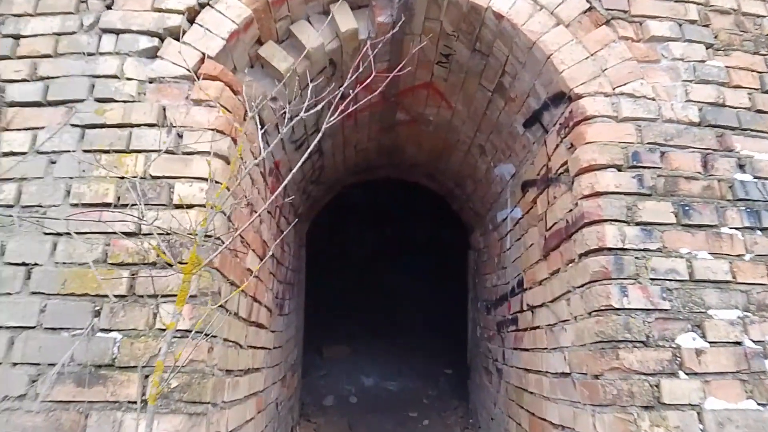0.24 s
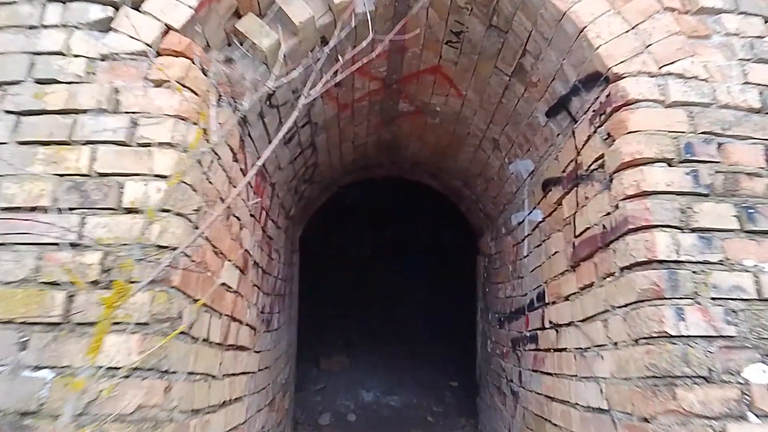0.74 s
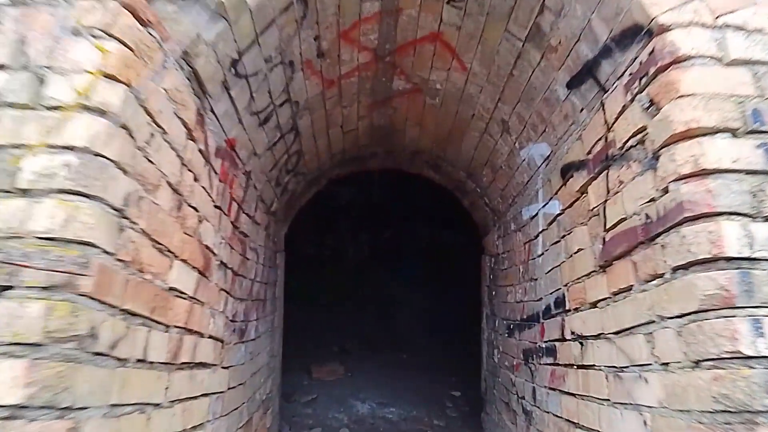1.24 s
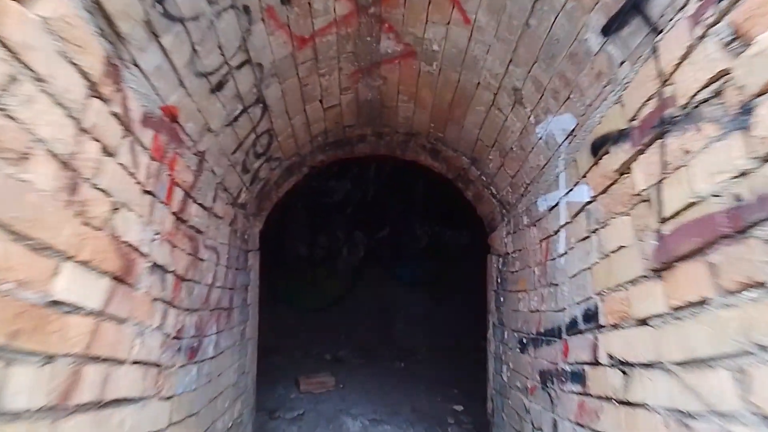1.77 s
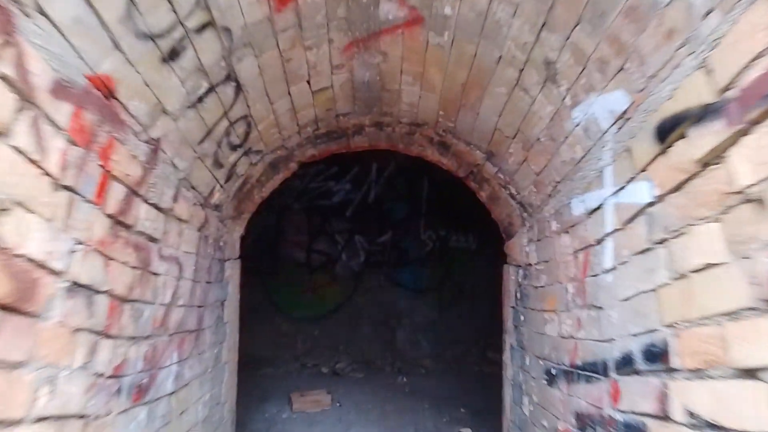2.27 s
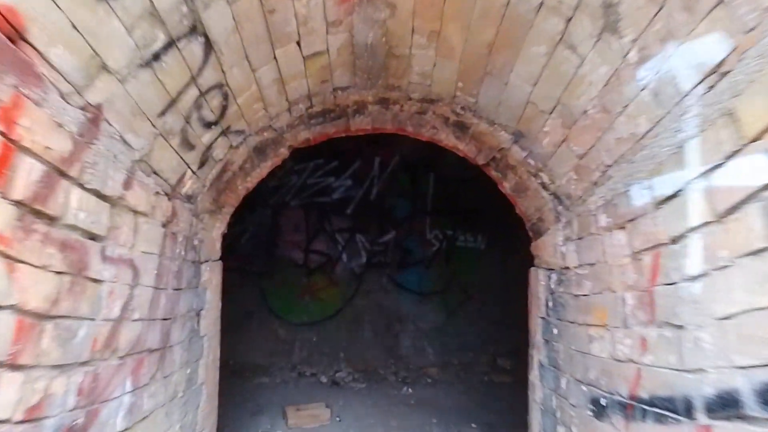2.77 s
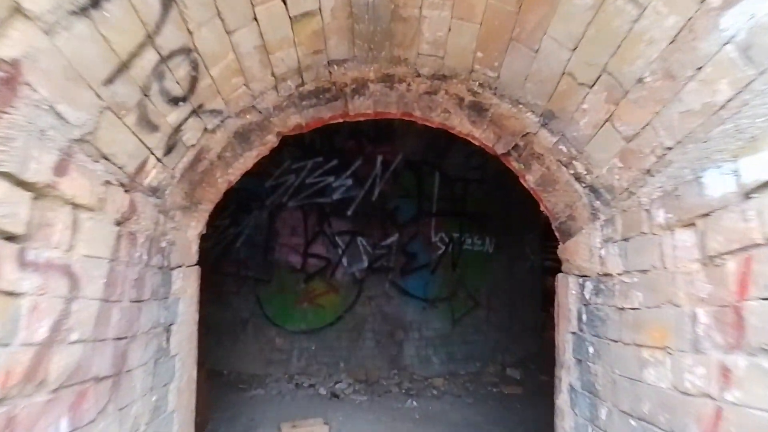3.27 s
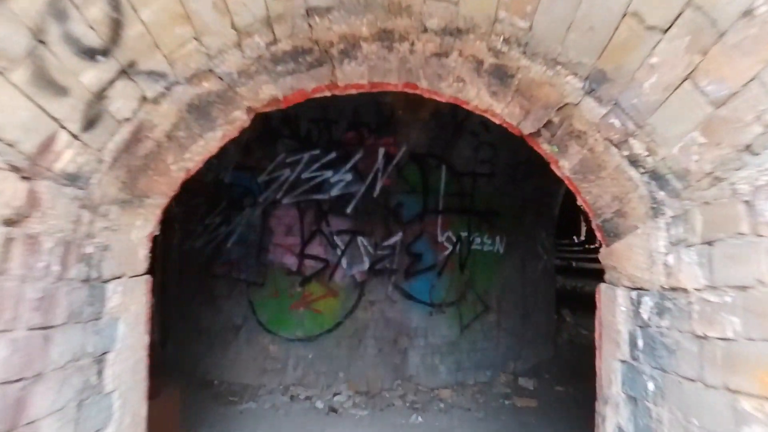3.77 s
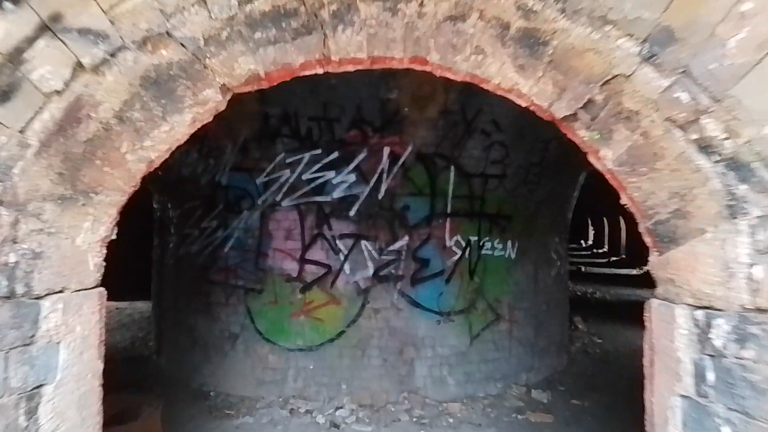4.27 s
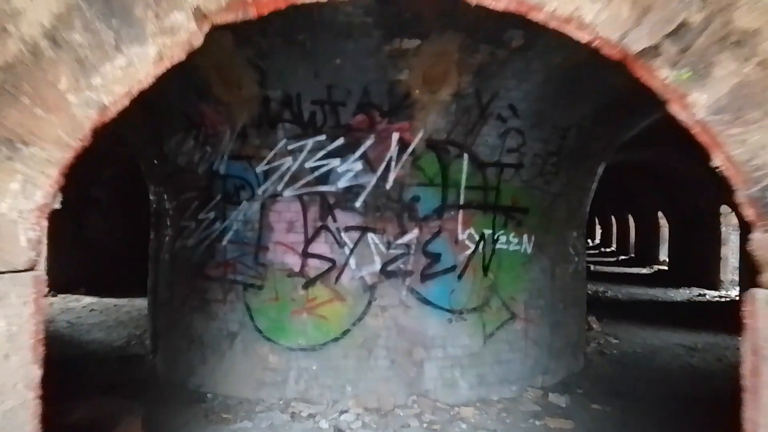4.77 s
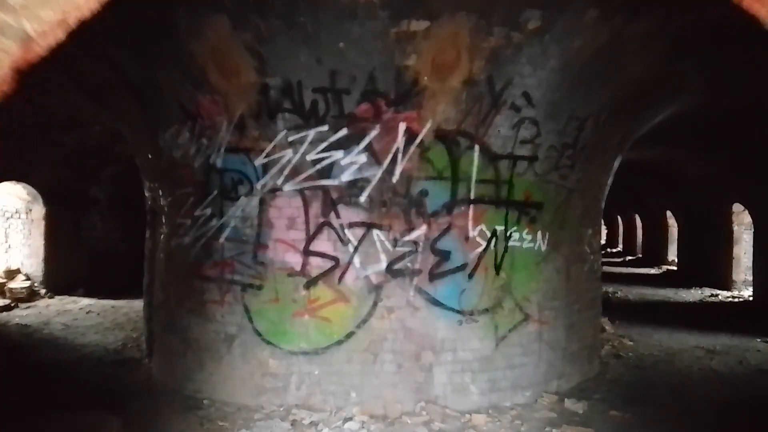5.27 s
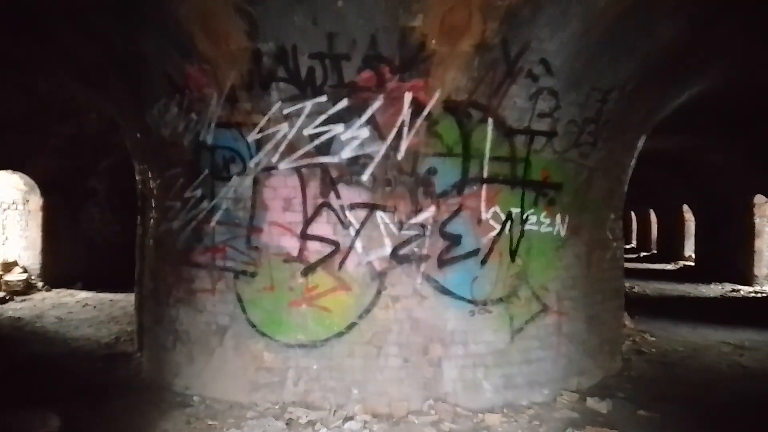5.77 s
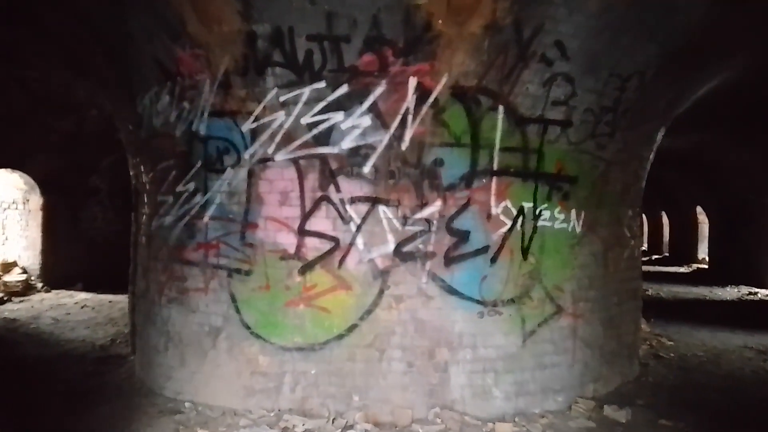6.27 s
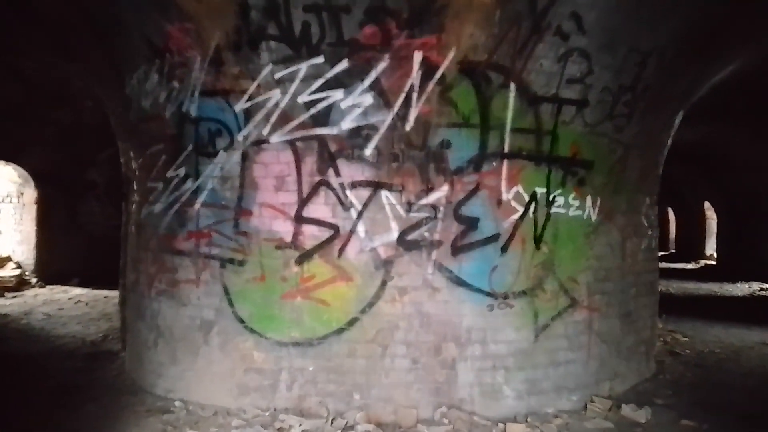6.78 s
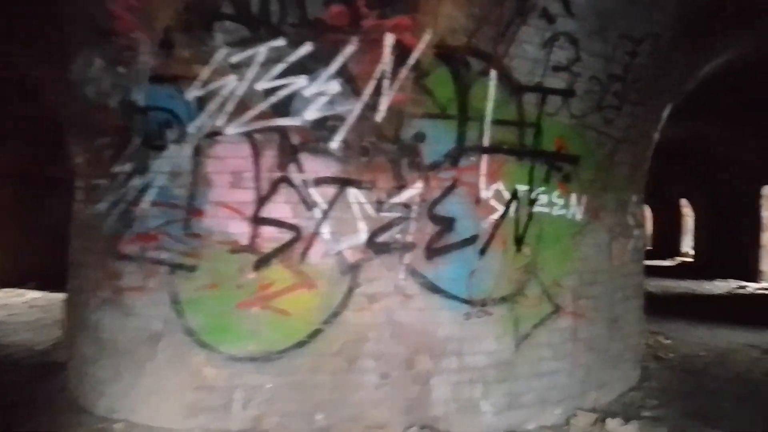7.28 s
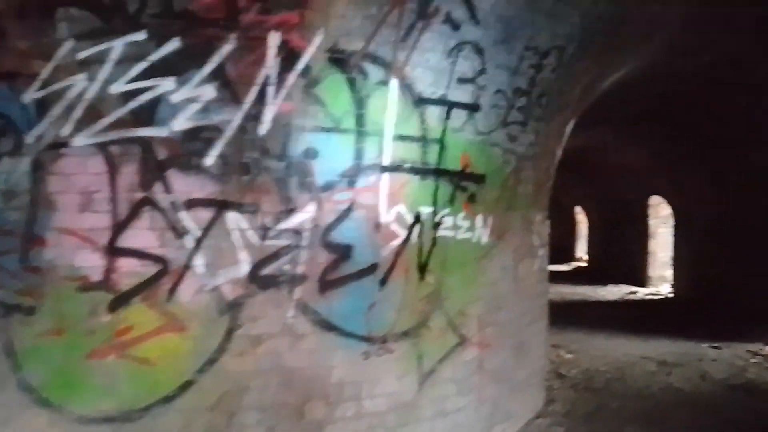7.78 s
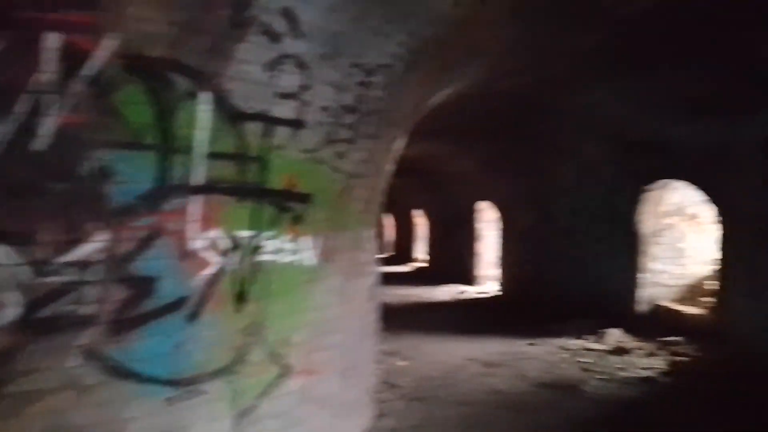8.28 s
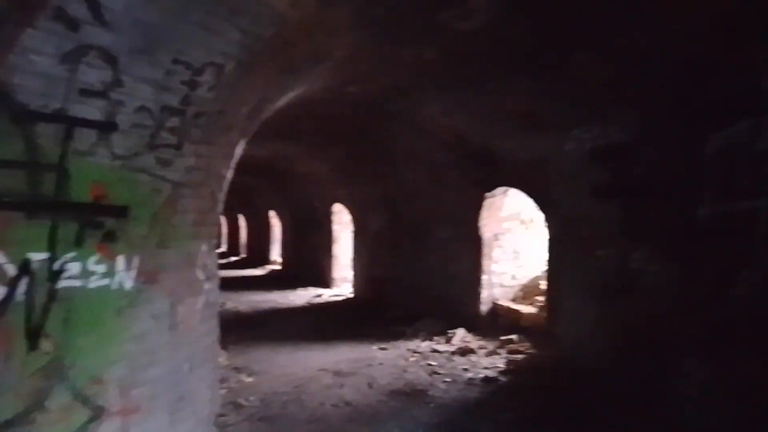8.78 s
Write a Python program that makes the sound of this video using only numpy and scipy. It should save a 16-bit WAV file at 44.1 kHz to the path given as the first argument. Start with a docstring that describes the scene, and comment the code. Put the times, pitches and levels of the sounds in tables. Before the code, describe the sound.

Slow footsteps crunch over loose broken brick and grit, pieces knocking underfoot, moving from open air through a brick passage into a quiet vault.

```python
"""Slow footsteps crunch over loose broken brick and grit, from open air through a brick passage to a vault.
A step is a damped thud plus a crunch of filtered grain impulses; scuffs, sand slides and chip ticks fill in.
Rocking brick pieces knock: a damped swing with a burst of noise through brick resonances.
Decaying noise gives the near walls' prompt echo and the vault's long, faint one; two resonances ring.
Beneath lie shaped-noise air, a low rumble, a thin drifting hiss and a low hum that swells at the end."""
import sys
import numpy as np
from scipy import signal
from scipy.fft import rfft, irfft
from scipy.io import wavfile
from scipy.ndimage import uniform_filter1d

SR = 44100
rng = np.random.default_rng(int(sys.argv[2]) if len(sys.argv) > 2 else 0)


def wav_record(signal):
    """Record a signal, one row per channel, as 16-bit PCM in the file named by sys.argv[1]."""
    frames = np.transpose(np.atleast_2d(signal))
    bounded = np.clip(frames, -1, 1)
    # unit amplitude maps onto the largest positive 16-bit level
    quanta = np.round(bounded * 32767).astype(np.int16)
    wavfile.write(sys.argv[1], SR, quanta)


N = 397782
TIME = np.arange(N) / SR
# likeness of left and right: f/Hz, coherence/1
LIKENESS = [(60, 1), (250, 1), (600, 0.68), (1500, 0.47), (3500, 0.2), (8000, 0.045)]
CRUMB_SPAN = 2.9  # ratio of crumb band edge to crunch pitch


def undb(db):
    """Decibels to gain."""
    return 10 ** (np.asarray(db) / 20)


def unit(x):
    """Scale to rms 1."""
    return x / np.sqrt(np.mean(x ** 2) + 1e-20)


def add(out, start_s, x):
    """Mix x into out at start_s, trimmed to fit."""
    i = int(round(start_s * SR))
    a, b = max(i, 0), min(i + x.shape[-1], N)
    out[:, a:b] += x[..., a - i:b - i]


def band(x, low_hz, high_hz, order=2):
    """High-pass followed by low-pass."""
    for hz, kind in ((low_hz, "high"), (high_hz, "low")):
        sos = signal.butter(order, min(hz, SR / 2 - 1000), kind, fs=SR, output="sos")
        x = signal.sosfilt(sos, x)
    return x


def resonate(x, hz, width_hz):
    """One resonance, gain 1 at its centre."""
    b, a = signal.iirpeak(min(hz, SR / 2 - 1000), hz / width_hz, fs=SR)
    return signal.lfilter(b, a, x)


def along(points, n):
    """Table (f/Hz, value) read on a log axis at the bins of an n-point spectrum."""
    hz, value = np.transpose(points)
    bin_hz = np.arange(n // 2 + 1) * SR / n
    return np.interp(np.log(bin_hz + 1), np.log(hz), value)


def over_time(points):
    """Table (t/s, value) read at every sample."""
    return np.interp(TIME, *np.transpose(points))


def spread(pair, likeness):
    """Two unrelated signals become left and right with the given coherence."""
    n = pair.shape[1]
    coherence = np.clip(along(likeness, n), 0, 1)
    mid, side = rfft(pair) * np.sqrt([(1 + coherence) / 2, (1 - coherence) / 2])
    return irfft(np.array([mid + side, mid - side]), n)


def walk(rate_hz, n=N):
    """Smooth random wandering, rms near 1."""
    hold = int(SR / rate_hz)
    held = np.repeat(rng.standard_normal(n // hold + 1), hold)
    return unit(uniform_filter1d(held, hold)[:n])


def outside(s):
    """1 in the open air, 0 in the passage; linear change while entering."""
    enters_s, entering_s = 2.0, 1
    return np.clip(.5 - (s - enters_s) / entering_s, 0, 1)


def in_passage(s):
    """1 where the walls are closest, 0 far from there."""
    narrowest_s, narrow_for_s = 3.6, 1.
    return np.exp(-((s - narrowest_s) / narrow_for_s) ** 2 / 2)


def ring(hz, cycles):
    """A soft push on a damped body: the swing peaks at 1 after some cycles and dies away."""
    turns = np.arange(int(10 * cycles / hz * SR)) * hz / SR
    envelope = turns / cycles * np.exp(1 - turns / cycles)
    return envelope * np.cos(2 * np.pi * (turns - cycles))


def footfalls(thud_cycles=1.1, rise_s=.007, decay_s=.028, crumb_below=3.1):
    """The weight thuds on packed ground, then the rubble gives way; returns thuds and crunches."""
    # footfalls: t/s, thud level/dB, thud f/Hz, lag of crunch top/s, crunch level/dB, crunch f/Hz,
    # fine grit re crunch/dB
    step_table = [(0.18, -52, 72.6, .008, -37, 780, -19), (1.264, -32, 147, .012, -36.5, 320, -31),
                  (2.338, -37, 84.8, 0.044, -41, 520, -39), (3.417, -23.5, 81.8, 0.012, -29, 568, -15),
                  (4.523, -34.5, 83.5, 0.034, -50.5, 810, -12), (5.455, -37.5, 89.3, 0.013, -42, 562, -9.5),
                  (6.338, -44.5, 145.5, .014, -41, 475, -12), (7.237, -38.5, 171, .013, -52, 600, -8.5),
                  (7.892, -37, 373, 0.0019, -46.5, 514, -11.5)]
    thuds, crunches = np.zeros((2, N)), np.zeros((2, N))
    for s, thud_db, thud_hz, lag_s, db, hz, grit_db in step_table:
        add(thuds, s, undb(thud_db) * ring(thud_hz, thud_cycles))
        # crumb_below: the full weight also breaks bigger, lower crumbs
        start_s, sound = crunch(s + lag_s, rise_s, decay_s, hz, crumb_below, grit_db)
        add(crunches, start_s, undb(db) * sound)
    return thuds, crunches


def scuffs(rise_share=.36):
    """Between footfalls the sole rolls, twists or drags over rubble; rise time = rise_share * decay."""
    # scuffs: t at the top/s, level/dB, decay/s, f/Hz, fine grit re scuff/dB
    scuff_table = [(.01, -48.5, 0.13, 770, -5.5), (.24, -38.5, 0.13, 1390, -11.5),
                   (0.421, -52, 0.16, 560, -5.5), (1.26, -39, 0.073, 1460, -27),
                   (1.336, -38.5, 0.062, 393, -3.5), (1.46, -45, 0.065, 500, -1.5),
                   (1.77, -54.5, 0.2, 1380, -7.5), (2.54, -38.5, 0.061, 697, -8),
                   (2.68, -51, 0.095, 640, -1), (2.8, -57.5, .13, 1700, -0.5),
                   (3.571, -48.5, 0.07, 654, -10.5), (4.291, -60.5, 0.045, 515, -20.5),
                   (4.69, -58.5, .06, 850, -27), (4.795, -50, 0.044, 745, -10.5),
                   (5.515, -50, .05, 1120, -9), (5.661, -57.5, 0.071, 808, -26),
                   (5.89, -64.5, 0.057, 450, -2.5), (6.529, -62, 0.062, 810, -4),
                   (6.8, -57.5, .085, 755, -6), (7.279, -49.5, 0.034, 660, -9.5),
                   (7.355, -51.5, .025, 796, -13), (7.655, -53, .055, 1504, -29.5),
                   (7.96, -43, .03, 315, -2.5), (8.03, -51, .03, 563, -3), (8.09, -48.5, 0.1, 1084, -2.5),
                   (8.2, -53, 0.058, 1500, 3.5)]
    out = np.zeros((2, N))
    for s, db, decay_s, hz, grit_db in scuff_table:
        start_s, sound = crunch(s, rise_share * decay_s, decay_s, hz, CRUMB_SPAN, grit_db)
        add(out, start_s, undb(db) * sound)
    return out


def crunch(s, rise_s, decay_s, hz, below, grit_db, sand_db=-8, fine_sand_db=8, crumb_db=-1,
           catch_db=3.5, catch_rate_hz=110):
    """Crumbs, chips, sand and grit fracture as the load swells and eases; returns start/s and sound."""
    coarse_outside, coarse_inside = 0.35, 0.71  # ground: sandy outside, coarser within (0-1)
    # snapping chips at typical_hz; brighter crunches hold more of them
    typical_hz, typical_chip_db, chip_db_per_octave = 800, -14.5, 6.5

    t = np.arange(-int(3 * rise_s * SR), int(6 * decay_s * SR)) / SR
    n = len(t)
    load = np.where(t < 0, np.exp(-(t / rise_s) ** 2 / 2), np.exp(-np.abs(t) / decay_s))
    coarse = np.clip(coarse_inside + (coarse_outside - coarse_inside) * outside(s), 0, 1)
    low_hz, high_hz = hz / below, hz * CRUMB_SPAN

    sand = unit(band(grains(n, rate_hz=3700, scatter_db=2.5), low_hz, high_hz))
    crumbs = crumble(n, low_hz, high_hz, rate_hz=150, scatter_db=5.5, sharpness=4.5)
    crumbs = unit(band(crumbs, low_hz / 1.7, 1.25 * high_hz, order=3))
    chips = crumble(n, low_hz=1500, high_hz=4230, rate_hz=55, scatter_db=7.0, sharpness=11)
    chips = unit(band(chips, low_hz=1200, high_hz=4220, order=6))
    grit = band(grains(n, rate_hz=3500, scatter_db=2.5), low_hz=2400, high_hz=6350)
    grit = unit(grit + undb(-7.5) * resonate(grit, hz=3620, width_hz=1100))

    # on coarse ground the sole catches and slips: crumbs break in clusters
    catches = unit(undb(coarse * catch_db * walk(catch_rate_hz, n)))
    crumb_part = undb(crumb_db) * crumbs * catches
    sand_part = undb(sand_db + fine_sand_db * (1 - coarse)) * sand
    body = unit(crumb_part + sand_part)
    chip_db = typical_chip_db + chip_db_per_octave * np.log2(hz / typical_hz)
    mix = body + undb(chip_db) * chips + undb(grit_db) * grit
    return s + t[0], load * spread(mix, LIKENESS)


def crumble(n, low_hz, high_hz, rate_hz, scatter_db, sharpness, count=7):
    """Crumbs of several sizes break, each size with its own pitch; big, low ones are loudest."""
    steps = (np.arange(count) + rng.random(count)) / count
    total = 0
    for step in steps:
        hz = low_hz * (high_hz / low_hz) ** step
        crumbs = resonate(grains(n, rate_hz, scatter_db), hz, hz / sharpness)
        total = total + unit(crumbs) * undb(-3 * step)
    return total


def grains(n, rate_hz, scatter_db):
    """Tiny fractures: impulses at random moments, many small, few large, as two unrelated trains."""
    size = undb(scatter_db * np.minimum(rng.exponential(size=(2, n)), 3.5))
    sign = rng.choice([-1, 1], (2, n))
    breaks = rng.random((2, n)) < rate_hz / SR
    return size * sign * breaks


def knocks(crack_s=.0006, chatter_s=0.0084, chatter_db=-20, lag_s_per_db=.00003, pinned_widening=3.8):
    """A piece rocks onto its neighbour: dull clack, sharp crack; returns direct sound and wall feed."""
    # knocks: t/s, clack peak/dB, clack f/Hz, crack level/dB, left minus right/dB
    knock_table = [(.083, -25.5, 333.7, -44, 6), (0.314, -37, 1450, -36, -3), (1.2642, -13, 285, -47, 1),
                   (1.2648, -18, 730, -54, 0), (1.3716, -17.5, 390, -16, .5), (2.3385, -47, 580, -51, 0),
                   (2.3766, -38.5, 362, -73, 3), (2.4885, -36.5, 920, -47, 2),
                   (2.5253, -3.5, 795, -35.5, 1.5), (2.645, -29, 860, -47, 1), (2.508, -37, 144, -70, 0.5),
                   (3.4135, -34, 1480, -44.5, -2), (3.418, -34, 151, -60, 3.5), (3.429, -27, 400, -50, -3),
                   (3.532, -35.5, 734, -57, 2.5), (3.5966, -15, 1026, -43.5, 2.5),
                   (3.599, -38, 270, -70, 0), (4.566, -43.5, 736, -56, 1), (4.647, -38.5, 950, -62, 2.5),
                   (4.779, -47, 1700, -48, -2.5), (4.8445, -51, 1562, -66, -1.5),
                   (5.4565, -38.5, 330, -59, -1), (5.503, -42, 810, -48, -1), (5.6241, -41.5, 950, -70, 4),
                   (5.886, -49, 270, -72, 2), (6.3404, -27.5, 1030, -37.5, -2),
                   (6.3436, -27.5, 640, -31, 4), (6.6872, -40, 960, -56, -2.5),
                   (7.2395, -41, 750, -52.5, -1), (7.272, -38.5, 840, -60, -1), (7.3179, -38, 970, -55, 2),
                   (7.33, -32.5, 970, -71, -1), (7.421, -45.5, 244, -56.5, 1.5), (7.913, -34, 300, -32, 3),
                   (7.9488, -29, 434, -27.5, 2.5), (8.056, -18.5, 1670, -34, 3.5),
                   (8.076, -23, 1720, -49, 3), (8.1387, -6.5, 3840, -15.5, 5),
                   (8.1578, -27, 1930, -33.5, 10.5), (8.198, -28, 1610, -30, 3.5),
                   (8.349, -47, 940, -55, 1)]
    # resonances of a cracking, freely ringing brick chip: f/Hz, width/Hz, relative level/dB
    brick_modes = [(860, 140, 4), (1650, 360, 12), (2700, 700, -1), (4200, 700, -2.5), (6300, 990, -11.5),
                   (10800, 2500, -13)]
    ring_s, min_cycles = 0.00058, 0.58  # equal ringing time, so high pieces swing more often
    # near echo of a firm_db knock; falls by wall_fall dB per dB, as loud pieces lie closest
    firm_db, firm_wall_db, wall_fall = -30, -4, 0.23
    outside_wall_db, passage_wall_db = -3, 7.5
    # treble edge of a soft_db crack; harder contact is brighter
    soft_db, soft_hz, db_per_octave = -50, 4500, 9.5

    direct, to_walls = np.zeros((2, N)), np.zeros((2, N))
    t = np.arange(2048) / SR
    # rough faces grind for a millisecond or two, then chatter briefly
    grind = t / crack_s * np.exp(1 - t / crack_s)
    pressure = grind + undb(chatter_db) * np.exp(-t / chatter_s)
    for s, db, hz, crack_db, pan_db in knock_table:
        cycles = max(min_cycles, hz * ring_s)
        wall_db = firm_wall_db - wall_fall * (db - firm_db)
        wall_db += outside_wall_db * outside(s) + passage_wall_db * in_passage(s)
        contact = rng.standard_normal((2, len(t))) * pressure
        # pinned under the sole (under one cycle of swing): wide resonances, dead crack
        widening = 1 + pinned_widening * np.clip(2 * (1 - cycles), 0, 1)
        crack = 0
        for mode_hz, free_width_hz, mode_db in brick_modes:
            width_hz = min(free_width_hz * widening, mode_hz)
            mode = resonate(contact, mode_hz, width_hz) / np.sqrt(width_hz / free_width_hz)
            crack = crack + undb(mode_db) * mode
        edge_hz = soft_hz * 2 ** ((crack_db - soft_db) / db_per_octave)
        crack = spread(band(crack, 20, edge_hz), LIKENESS)
        # crack level is the rms of its first 1.5 ms
        crack *= undb(crack_db) / np.sqrt(np.mean(crack[:, t < .0015] ** 2))
        clack = undb(db) * ring(hz, cycles)
        for ear, sign in zip(np.eye(2)[:, :, None], (1, -1)):
            # the nearer side hears it louder and sooner
            gain = ear * undb(sign * pan_db / 2)
            arrival_s = s - sign * pan_db * lag_s_per_db / 2
            for part in (clack, crack):
                add(direct, arrival_s, gain * part)
                add(to_walls, arrival_s, gain * part * undb(wall_db))
    return direct, to_walls


def slides(span=1.45, edge_s=0.072):
    """Fine sand hisses under the sliding sole; edge_s to get going and to stop."""
    # slides: start t/s, length/s, level/dB, centre f/Hz
    slide_table = [(.36, .38, -60, 557), (2.441, 0.096, -53.5, 2400), (2.618, 0.32, -58.5, 4730),
                   (2.637, 0.29, -57, 9500), (3.581, 0.13, -59.5, 6000), (6.03, .22, -65.5, 7500),
                   (6.852, .18, -61, 7440), (7.821, 0.15, -51, 540), (7.637, 0.18, -65, 8500),
                   (8.03, 0.32, -57, 12000), (8.252, 0.17, -53, 5200)]
    out = np.zeros((2, N))
    for s, length_s, db, hz in slide_table:
        t = np.arange(int(length_s * SR)) / SR
        speed = np.clip(np.minimum(t, length_s - t) / edge_s, 0, 1)
        sand = grains(len(t), rate_hz=6400, scatter_db=1.5)
        sand = unit(band(sand, hz / span, hz * span, order=4))
        add(out, s, undb(db) * speed * spread(sand, LIKENESS))
    return out


def ticks(typical_hz=4000, typical_width_hz=2200, width_power=1.5):
    """A small chip splinters: a very short burst, wider in band the higher it is (more damping)."""
    # ticks: t/s, level/dB, centre f/Hz, decay/s, left minus right/dB
    tick_table = [(0.3132, -32, 1870, 0.0011, 4), (.487, -40.5, 3400, .002, 3),
                  (.944, -43.5, 3760, 0.0018, 8), (1.55, -26, 4520, 0.00092, -4),
                  (1.571, -32.5, 3934, 0.0019, -2), (1.935, -36, 3040, 0.0012, 1),
                  (2.256, -49, 3930, 0.002, -5), (3.597, -29.5, 1610, 0.0044, -1),
                  (4.69, -54.5, 1480, .014, 2), (4.778, -43, 1970, .006, 3), (5.756, -42, 5860, 0.008, 2),
                  (6.279, -43.5, 5270, 0.0058, 1), (6.452, -52.5, 3265, 0.023, 0.5),
                  (7.166, -54, 2000, 0.022, -2), (7.928, -26.5, 5600, .0022, 3),
                  (7.949, -27, 1560, 0.00523, 5.5), (7.949, -23.5, 6560, .0023, 4),
                  (8.139, -21.5, 870, 0.003, -1), (8.146, -38, 4700, .004, -5.5)]
    out = np.zeros((2, N))
    t = np.arange(4096) / SR
    for s, db, hz, decay_s, pan_db in tick_table:
        width_hz = typical_width_hz * (hz / typical_hz) ** width_power
        burst = resonate(rng.standard_normal((2, len(t))), hz, width_hz)
        burst = unit(spread(band(burst, hz / 3, 1.3 * hz, order=3), LIKENESS))
        side_db = db + np.array([[pan_db], [-pan_db]]) / 2
        add(out, s, burst * np.exp(-t / decay_s) * undb(side_db))
    return out


def echo(x, t60_s, gap_s, low_hz, high_hz):
    """Scattered reflections from rough brick: after a gap, decaying noise of about unit energy in band."""
    t = np.arange(int(t60_s * SR)) / SR
    fade = np.exp(-np.log(1000) * t / t60_s) * np.clip(t / gap_s - 1, 0, 1)
    noise = spread(rng.standard_normal((2, len(t))), LIKENESS)
    response = band(noise * fade / np.sqrt(np.sum(fade ** 2)), low_hz, high_hz, order=1)
    return signal.fftconvolve(x, response, axes=1)[:, :N]


def standing_waves(x, mouth_s=4.7, mouth_for_s=0.43, gain_db=19.5):
    """Close walls ring on at a few pitches, most at the inner mouth of the passage."""
    # standing waves between the close walls: f/Hz, width/Hz, level re gain_db/dB
    passage_modes = [(313, 40, -1), (1491, 140, -9)]
    nearness = np.exp(-((TIME - mouth_s) / mouth_for_s) ** 2 / 2)
    fed = x * nearness
    return sum(undb(db + gain_db) * resonate(fed, hz, width_hz) for hz, width_hz, db in passage_modes)


def hiss(core_hz=480, skirt_hz=1200, skirt_db=-4, skirt_ratio=.82):
    """Slow noise on a drifting carrier: a band of hiss with a wide lower skirt swells and fades."""
    # swells: t at the top/s, level/dB
    swell_table = [(.1, -55), (1.2, -65.5), (1.8, -57), (2.3, -71.5), (2.8, -59.5), (5.06, -65),
                   (5.55, -65.5), (6.149, -62.5), (6.85, -65.5), (7.7, -65.5)]
    # carrier drift, upward overall: t/s, f/Hz
    centre_table = [(0, 3010), (2.2, 4230), (2.8, 5140), (4.5, 5370), (5.9, 6610), (7.2, 6590), (7.7, 7830)]
    rise_s, fall_s, rest_db = 0.11, 0.22, -84.5
    phase = 2 * np.pi * np.cumsum(over_time(centre_table)) / SR
    noise = 0
    for half_width_hz, ratio, db in ((core_hz, 1, 0), (skirt_hz, skirt_ratio, skirt_db)):
        slow = unit(band(rng.standard_normal((2, 2, N)), 0.97, half_width_hz))
        carried = slow[0] * np.cos(ratio * phase) + slow[1] * np.sin(ratio * phase)
        noise = noise + undb(db) * carried
    level = undb(rest_db)
    for s, db in swell_table:
        away = np.maximum((s - TIME) / rise_s, (TIME - s) / fall_s)
        level = level + undb(db) * np.exp(-away)
    return unit(noise) * level


def hum(hz=131, end_db=-54, swell_db_per_s=50):
    """A faint low tone, wavering in pitch and level, swells at the end."""
    phase = 2 * np.pi * np.cumsum(hz * (1 + 0.018 * walk(12))) / SR
    level_db = end_db - swell_db_per_s * (TIME[-1] - TIME) + 2 * walk(10)
    return np.sin(phase) * undb(level_db)


def air(air_db=-62, outside_air_db=3, walk_db=0.44, rumble_walk_db=4.5):
    """Still air as faint shaped noise, louder outside, over an uneven low-band rumble."""
    # spectrum of the still air: f/Hz, relative density/dB
    air_spectrum = [(20, -19.5), (32, -4.5), (45, -2), (65, -2.5), (110, -11), (180, -13.5), (350, -15),
                    (700, -18), (1500, -21.5), (3500, -26.5), (7000, -33.5), (12000, -33.5), (16000, -35.5)]
    # likeness of left and right: f/Hz, coherence/1
    air_likeness = [(60, 0.94), (130, 0.61), (290, .55), (640, .15), (3000, 0.02)]
    # rumble before its wander: t/s, level/dB
    rumble_table = [(0, -63.5), (.43, -51), (.66, -73), (4.3, -70.5), (5.1, -68), (5.6, -73), (6.25, -64.5),
                    (6.9, -65), (7.15, -68), (9.02, -66.5)]
    noise = irfft(rfft(rng.standard_normal((2, N))) * undb(along(air_spectrum, N)), N)
    still_db = air_db + outside_air_db * outside(TIME) + walk_db * walk(6)
    still = unit(spread(noise, air_likeness)) * undb(still_db)
    # mostly common to both sides
    rumble = rng.standard_normal(N) + undb(-13.5) * rng.standard_normal((2, N))
    rumble = unit(band(rumble, low_hz=46.3, high_hz=114.9, order=3))
    return still + rumble * undb(over_time(rumble_table) + rumble_walk_db * walk(9.4))


def scene():
    """Steps, their near echo, the long answer of the vault and the background."""
    clacks, to_walls = knocks()
    thuds, crunches = footfalls()
    rubble = crunches + scuffs() + slides() + ticks()
    steps = clacks + rubble + thuds
    near = echo(to_walls + undb(-10) * rubble, t60_s=0.1, gap_s=0.00082, low_hz=150, high_hz=7000)
    vault = echo(steps, t60_s=0.75, gap_s=0.023, low_hz=200, high_hz=4000)
    return steps + near + standing_waves(near) + undb(-32) * vault + hiss() + hum() + air()


def record(dry, ceiling=.88, top_hz=15900):
    """Peaks are rounded; the treble edge rises over the first seconds, then stays at the cut-off."""
    # treble opening: t/s, upper edge f/Hz
    treble_edge = [(0, 8300), (5.1, 15900), (9.02, 15900)]
    rounded = ceiling * np.tanh(dry / ceiling)
    hz, s, frames = signal.stft(rounded, SR, nperseg=256)
    edge_hz = np.interp(s, *np.transpose(treble_edge))
    # 1 dB down per 25 Hz above the edge, at most 28 dB
    cut_db = np.clip((hz[:, None] - edge_hz) / 25, 0, 28)
    opened = signal.istft(frames * undb(-cut_db), SR)[1][:, :N]
    return signal.sosfilt(signal.ellip(8, .2, 70, top_hz, fs=SR, output="sos"), opened)


dry = scene()
out = record(dry)
wav_record(out)
```